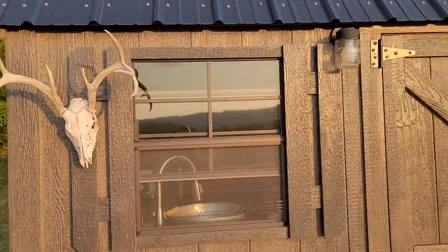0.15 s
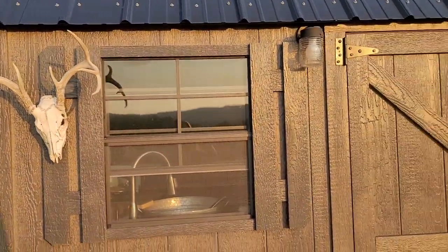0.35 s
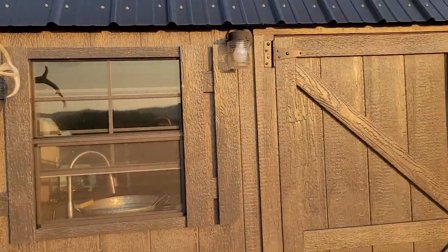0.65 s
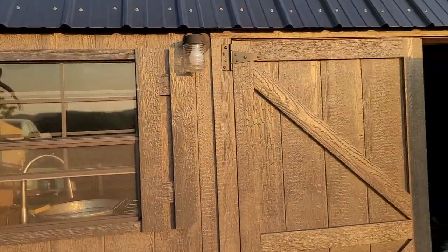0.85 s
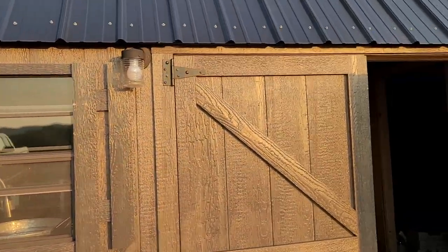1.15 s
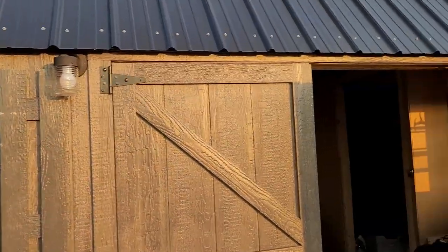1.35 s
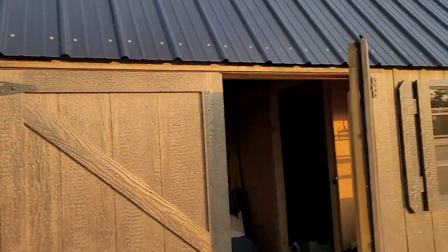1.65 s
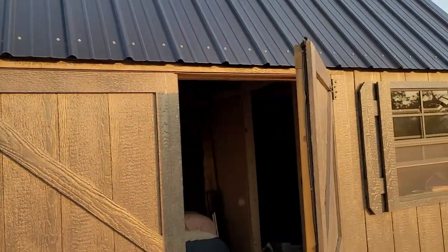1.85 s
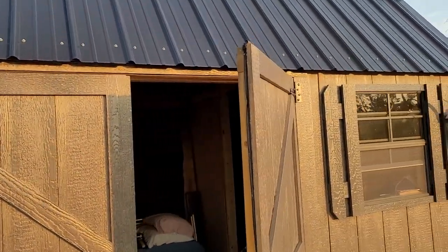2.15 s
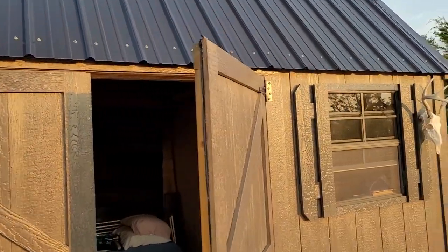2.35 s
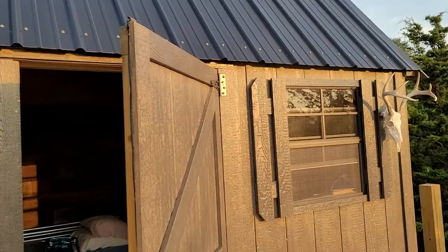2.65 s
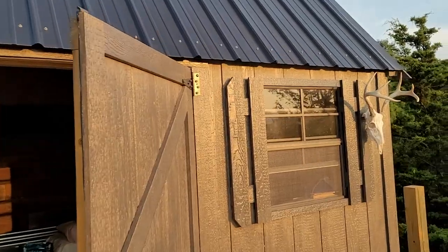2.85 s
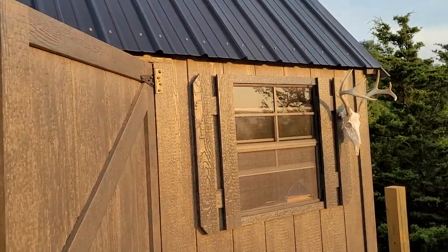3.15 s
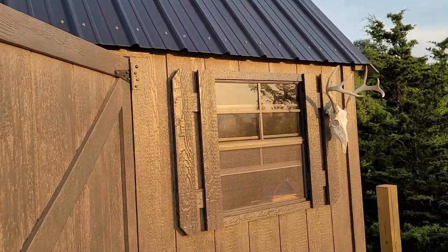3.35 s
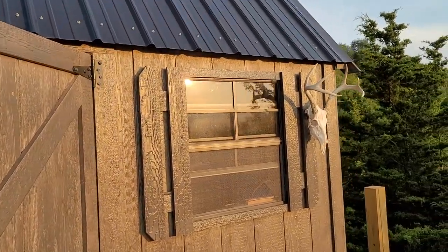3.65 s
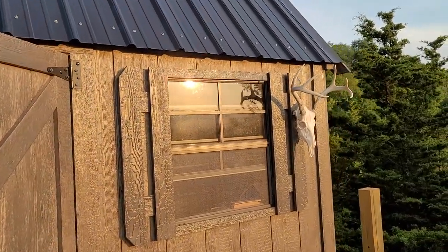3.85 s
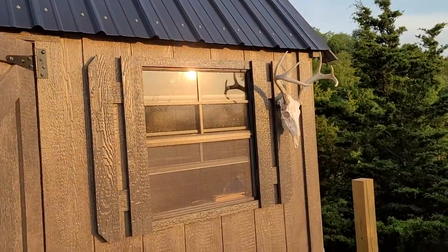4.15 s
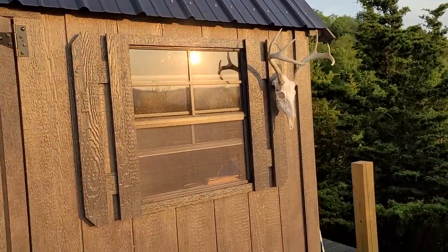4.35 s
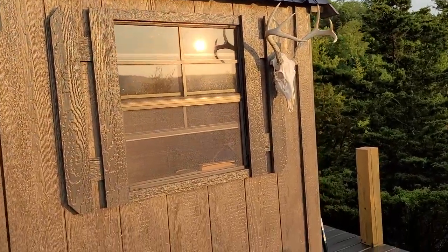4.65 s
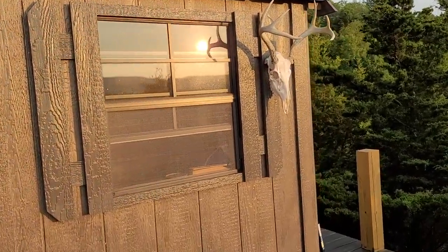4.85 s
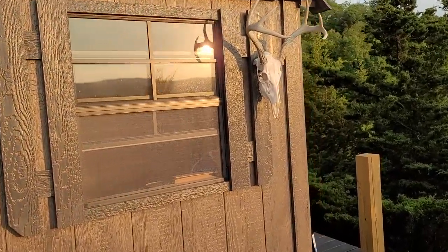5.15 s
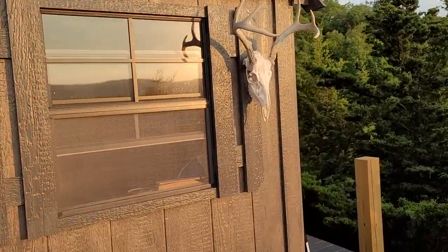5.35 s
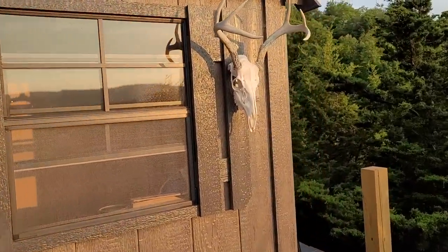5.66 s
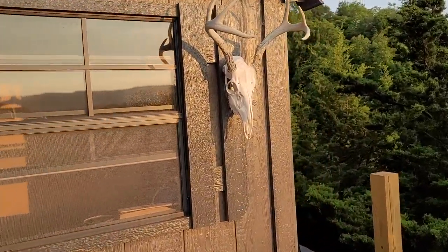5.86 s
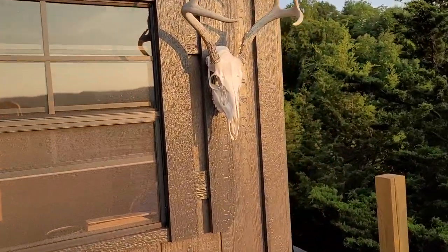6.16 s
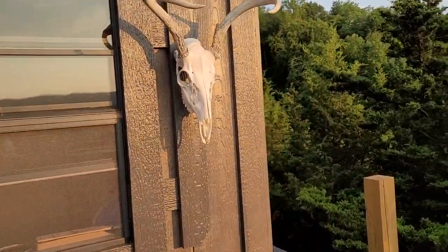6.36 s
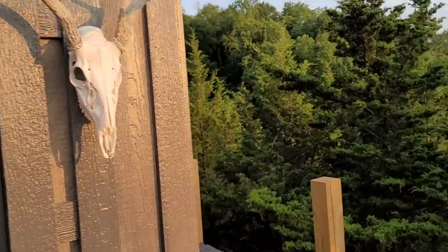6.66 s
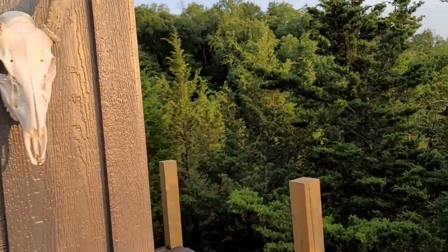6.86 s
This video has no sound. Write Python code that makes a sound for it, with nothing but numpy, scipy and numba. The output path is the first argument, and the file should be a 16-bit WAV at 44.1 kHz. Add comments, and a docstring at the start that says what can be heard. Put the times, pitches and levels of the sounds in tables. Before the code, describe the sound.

Hollow boards respond to irregular steps close to a stereo microphone: dull thuds, a few hard cracking knocks, little scuffs, and low wooden shudders as weight settles. Behind them are a very high, fine insect trill, a single tiny bird chip on the right early on, smooth country air and gusting low rumble. Steps are sparse and soft midway, then strong and crowded near the end.

```python
"""A wooden deck beside a shed wall in the country: someone walks along it unevenly.
Heels thud the joists and knock the planks (struck decaying modes), among short noise bursts (filtered noise).
The deck grumbles under the shifting weight (noise through joist resonances that dies away).
One cricket trills close on the left before a far chorus (gliding tones, grainy noise); a bird chips once
on the right; smooth hiss and gusting low rumble (filtered noise) lie behind."""
import sys
import numpy as np
from scipy import signal
from scipy.fft import rfft, irfft
from scipy.io import wavfile
from scipy.ndimage import uniform_filter1d
from numba import njit

SR = 44100
rng = np.random.default_rng(int(sys.argv[2]) if len(sys.argv) > 2 else 0)


def master(y):
    """Save y as 16-bit WAV."""
    cut = np.clip(np.atleast_2d(y).T, -1, 1)
    pcm = np.round(cut * 32767)  # scale
    wavfile.write(sys.argv[1], SR, pcm.astype(np.int16))


def decibels_to_gain(level_db):
    """Convert a level in decibels to a linear amplitude gain (20 dB per decade)."""
    exponent = np.asarray(level_db, float) / 20
    return 10 ** exponent


N = 308691  # samples
LR = np.array([[1], [-1]])  # sign of left, right


def level(x, db):
    """Scale to an rms level."""
    return x * decibels_to_gain(db) / np.sqrt(np.mean(x ** 2) + 1e-30)


def loudness(x, db, window):
    """Scale a blow so that the loudest stretch of window samples, left-right mean, has this rms."""
    return x * decibels_to_gain(db) / np.sqrt(uniform_filter1d(x.mean(axis=0) ** 2, window).max())


def on_log(hz, table):
    """Read a (Hz, value) table on a log-frequency axis."""
    f, v = np.transpose(table)
    return np.interp(np.log(np.maximum(hz, 1)), np.log(f), v)


def colour(x, gain):
    """Filter by a gain given as a function of Hz."""
    n = x.shape[-1]
    return irfft(rfft(x) * gain(np.arange(n // 2 + 1) * SR / n), n)


def walk(rate_hz):
    """Random levels held 1 / rate_hz seconds and slewed twice; spread near 1."""
    k = int(SR / rate_hz)
    held = np.repeat(rng.standard_normal(N // k + 1), k)
    return 0.87 * uniform_filter1d(uniform_filter1d(held, k), k)[:N]


def add(out, x, start_s):
    """Mix x in at start_s."""
    i = int(start_s * SR)
    out[:, i:i + x.shape[1]] += x[:, :N - i]


@njit
def ring(poles, left, right, size):
    """Impulse response of decaying modes, each with its own size at the two microphones."""
    out = np.zeros((2, size))
    for k in range(len(poles)):
        z = 1 + 0j
        for i in range(min(size, int(-8 / np.log(abs(poles[k]))))):
            out[0, i] += z.imag * left[k]
            out[1, i] += z.imag * right[k]
            z *= poles[k]
    return out


# Stereo width of the struck wood. Each row: frequency in Hz, side minus mid in dB.
WOOD_SIDE_DB = [(60, -14), (200, -14), (350, -6), (700, 3), (1400, 3), (2800, -1), (8000, 0)]


def modes(hz, t60_s, db, size):
    """Strike modes; the bass reaches both microphones alike, the middle often in opposite phase."""
    mid, side = rng.choice([-1., 1.], (2, len(hz))) * decibels_to_gain(db)
    side = side * decibels_to_gain(on_log(hz, WOOD_SIDE_DB))
    poles = np.exp(2j * np.pi * hz / SR - np.log(1000) / (t60_s * SR))
    return ring(poles, mid + side, mid - side, size)


def contact(length_s, size):
    """Spectrum of a landing sole: tiny impacts swell, then thin, and drive all modes about alike."""
    t = np.arange(size) / SR / length_s
    impacts = rng.standard_normal(size) * rng.random(size) ** 6.0
    rattle = rfft(impacts * t * np.exp(-t))
    even = irfft(rattle / np.abs(rattle) ** .7, size)
    return rfft(even * np.exp(-(t / 5) ** 4))


# Footfalls. Each row: start in seconds, knock level in dB (loudest 20 samples), thud level in dB
# (loudest 1300 samples), thud in Hz, favoured plank tone in Hz, treble slope in dB per octave.
FOOTFALLS = [(0.103, -43.5, -23.5, 145.2, 434, -23), (0.187, -43.5, -37, 136.3, 1360, -8),
             (0.31, -46, -39, 143, 444, -19), (0.957, -40.5, -38, 254, 1300, -18),
             (1.037, -48.5, -44.5, 154.5, 536, -21), (1.12, -48, -46, 176, 439, -12),
             (1.173, -28, -44, 144, 600, -14), (1.587, -15.5, -35.5, 200, 673, 2.5),
             (1.878, -53, -45.5, 165.3, 422, -21), (2.068, -20.5, -40.5, 310, 806, -13),
             (2.569, -31, -25.5, 170.5, 645, -10), (2.626, -37, -38, 272, 666, -15.5),
             (3.406, -50.5, -39.5, 297, 394, -7), (3.454, -57.5, -47.5, 221, 423, 1),
             (3.577, -32, -42, 291.4, 610, -30.5), (4.43, -41, -45.5, 121, 800, -12),
             (4.466, -49.5, -39, 156.6, 430, 3), (4.592, -45, -49.5, 189, 566, -20),
             (5.342, -47.5, -41.5, 238, 930, -11.5), (5.484, -40, -41.5, 202.5, 810, -26),
             (5.717, -24, -40.5, 186, 346, -6), (5.828, -15.5, -35, 199.5, 539, 1.5),
             (6.168, -37, -28, 232, 470, -14), (6.22, -35, -34, 187.7, 710, -18.5),
             (6.327, -11.5, -27, 253.5, 990, 3), (6.403, -18.5, -31.5, 302.8, 610, 0.5),
             (6.967, -31.5, -33.5, 312, 423, -23)]
# Strength of the plank modes. Each row: frequency in Hz, relative level in dB.
PLANK_DB = [(250, -6), (400, -5), (620, -1), (850, -5), (1100, 0.5), (1450, 1), (2000, 1.5), (2500, -1),
            (3300, -0.5), (4700, -10), (6100, -3), (7500, -13), (10000, -23.5), (15000, -22)]
# Damping of the plank modes. Each row: frequency in Hz, t60 in seconds.
PLANK_T60_S = [(250, 0.33), (500, 0.16), (1100, 0.096), (2900, 0.056), (8000, 0.038)]
# Scatter from the wall and the hollow under the boards: level in dB, t60 in seconds, treble edge in Hz.
SCATTER_SETTINGS = (-15.5, 0.16, 4900)
BEAM_HZ, BEAM_DB, BEAM_T60_S = 75.9, -2, 0.15  # long beam under the deck; dB is its most, re the thud mode
LOAD_S, LOAD_POWER = 0.011, 2.2  # heel loading time on a 200 Hz joist; longer on lower ones


def step(knock_db, thud_db, thud_hz, tone_hz, slope_db):
    """One footfall: a heel thud in the joists and a knock in the planks."""
    size = 10240
    t = np.arange(size) / SR

    # a firm heel moves the long beam; a flat slap or a gently lowered foot hardly
    beam_db = BEAM_DB - 0.48 * abs(thud_db - knock_db - 8.5)
    joist_hz = np.array([BEAM_HZ, thud_hz, 1.2 * thud_hz, 1.8 * thud_hz])
    joist_t60_s = np.array([BEAM_T60_S, .19, .12, .12])
    joist = modes(joist_hz, joist_t60_s, np.array([beam_db, 0, -9, beam_db - 11]), size)
    # the heel loads the joist over a few cycles, so the thud swells
    load_s = LOAD_S * (200 / thud_hz) ** LOAD_POWER
    thud = joist * (1 - np.exp(-(t / load_s) ** 3))

    # many close, quickly damped plank modes; where the foot lands favours a few
    hz = np.geomspace(250, 15000, num=360) * (1 + .004 * rng.standard_normal(360))
    favour_db = 9.0 * np.exp(-(np.log2(hz / tone_hz) / .15) ** 2)
    # a soft sole loses the treble, bending near 1200 Hz
    soft_db = slope_db * np.log2(1 + (hz / 1200) ** 2) / 2
    plank_db = on_log(hz, PLANK_DB) + soft_db + favour_db
    planks = rfft(modes(hz, on_log(hz, PLANK_T60_S), plank_db, size))

    echo_db, echo_t60_s, edge_hz = SCATTER_SETTINGS
    echoes = rng.standard_normal((2, size)) * 1000. ** (-t / echo_t60_s) * np.minimum(t / .008, 1)
    echoes = rfft(echoes / np.linalg.norm(echoes[0])) * decibels_to_gain(echo_db)
    echoes = echoes / (1 + (np.arange(size // 2 + 1) * SR / size / edge_hz) ** 2)

    # a heavy blow makes the loose boards chatter longer
    rattle_s = 0.0017 * decibels_to_gain(0.23 * (knock_db + 21.5))
    knock = irfft(planks * contact(rattle_s, size) * (1 + echoes), size)
    return loudness(knock, knock_db, window=20) + loudness(thud, thud_db, window=1300)


# Short noise bursts; the one at 1.562 is a faint broadband smear just before the slap.
# Each row: start in seconds, length in seconds, rms in dB, centre in Hz, width in octaves.
NOISE_BURSTS = [(0.162, .02, -60, 1900, 1.5), (1.038, 0.078, -65, 3370, 1.1),
                (1.562, 0.037, -47.5, 2830, 2.4), (1.932, 0.024, -51.5, 2480, 1.9),
                (3.742, 0.11, -69, 1750, 2), (4.45, 0.079, -64, 3360, 1.4), (4.535, 0.12, -64, 3100, 1.1),
                (4.717, 0.052, -69, 1210, 0.56), (5.435, 0.015, -59, 1490, 1.4),
                (5.563, 0.03, -53.5, 2300, 2.1), (6.779, 0.014, -67.5, 1700, 0.42)]


def noise_burst(length_s, db, hz, octaves):
    """Band of noise whose level jumps at random every few milliseconds."""
    size = int(length_s * SR)
    jump_db = 4.8 * np.repeat(rng.standard_normal(size // 100 + 1), 100)[:size]
    grains = rng.standard_normal((2, size)) * decibels_to_gain(jump_db) * np.hanning(size) ** 0.16
    band = colour(grains, lambda f: np.exp(-(np.log2(f / hz + 1e-9) / octaves) ** 2 * 2))
    return level(band, db)


# Weight settling on the boards. Each row: start in seconds, rms in dB before shudder, t60 in seconds.
SETTLING = [(0.14, -43, 0.89), (0.968, -39.5, 1.19), (1.18, -43, 0.29), (1.61, -33, 0.63), (1.88, -62, 9),
            (2.08, -32, 0.32), (2.6, -40.5, 1.27), (3.42, -39, 0.3), (3.6, -58.5, 5.4), (4.44, -41.5, 1.14),
            (4.6, -50.5, 0.56), (5.35, -50, .4), (5.5, -48, 1.1), (5.64, -51.5, 2.6), (5.838, -35.5, 0.7),
            (6.19, -49, 3.3), (6.339, -40.5, 1.9), (6.6, -62.5, 2.5)]
# Joist resonances. Each row: centre in Hz, width in Hz, relative gain in dB.
JOIST_RESONANCES = [(142, 35, 2.5), (200, 63, 4), (247, 210, -16.5), (371.7, 17, -18), (680, 580, -23.5)]
WEIGHT_RISE_S = 0.0083


def deck():
    """Weight settling on a foot shakes the joist resonances in uneven shudders that die away."""
    def gain(f):
        peaks = sum(decibels_to_gain(db) / np.sqrt(1 + ((f - hz) / (width_hz / 2)) ** 4)
                    for hz, width_hz, db in JOIST_RESONANCES)
        return peaks * np.minimum(f / 110, 1) ** 3

    mid, side = rng.standard_normal((2, N))
    side = colour(side, lambda f: gain(f) * decibels_to_gain(on_log(f, WOOD_SIDE_DB)))
    grumble = colour(mid, gain) + LR * side
    power = 0
    for start_s, db, t60_s in SETTLING:
        since_s = np.maximum(np.arange(N) / SR - start_s, 0)
        rise = np.minimum(since_s / WEIGHT_RISE_S, 1)
        power = power + (decibels_to_gain(db - 60 * since_s / t60_s) * rise) ** 2
    shudder = decibels_to_gain(3.5 * walk(25))
    return level(grumble, 0) * np.sqrt(power) * shudder


def trill(hz, rate_hz, glide, duty, limp, scatter_db):
    """Each wing stroke is a short tone, quick to start, sliding down; limp pairs strokes: short gap, long."""
    beat = np.cumsum(rate_hz * (1 + .015 * walk(3))) / SR + rng.random()
    early = limp * (np.floor(beat) % 2)
    part = np.clip((beat % 1 - limp + early) / duty, 0, 1)  # progress through the stroke
    stroke = np.sin(np.pi * part ** .65)
    pitch_hz = hz * (1 + glide * (.5 - part) + 0.0048 * walk(90))
    tone = stroke * decibels_to_gain(scatter_db * walk(60)) * np.sin(2 * np.pi * np.cumsum(pitch_hz) / SR)
    return level(colour(tone, lambda f: 1 / (1 + (f / 8900) ** 60)), 0)


# Cricket levels. Each row: time in seconds, near level in dB (left plays 6 dB above it),
# chorus rms in dB before panning.
CRICKET_LEVELS = [(0, -60, -52), (0.801, -61.5, -53.5), (1.5, -57.5, -53.5), (2.2, -59.5, -55),
                  (3.001, -61.5, -55), (3.7, -60, -54), (4.15, -56, -55), (4.4, -83, -54),
                  (5.2, -71, -55.5), (6, -68, -56), (7, -66.5, -57)]
# Chorus spectrum. Each row: frequency in Hz, relative level in dB.
CHORUS_DB = [(5800, -36), (6300, -25.5), (6760, -13.5), (7200, -7.5), (7700, -4), (8100, -9.5), (8500, -20),
             (8850, -28.5), (9200, -68)]
NEAR_PAN_DB, CHORUS_PAN_DB = 15, 5  # left minus right


def crickets():
    """A near singer and a far crowd whose strokes blur into a grainy band."""
    time_s, near_db, far_db = np.transpose(CRICKET_LEVELS)
    t = np.arange(N) / SR
    near = trill(7850, 52.5, .07, .37, .22, 2.5)
    near = near * decibels_to_gain(LR * NEAR_PAN_DB / 2) / decibels_to_gain(NEAR_PAN_DB / 2) * 2
    blur = colour(rng.standard_normal((2, N)), lambda f: decibels_to_gain(on_log(f, CHORUS_DB)))
    far = level(blur * decibels_to_gain(1.3 * np.array([walk(160), walk(120)])), 0)
    for hz in np.linspace(6900, 8200, num=4):
        singer = trill(hz, rng.uniform(45, 68), .05, .55, .15, 3.0)
        far = far + singer * decibels_to_gain(on_log(hz, CHORUS_DB) - 6 + LR * rng.standard_normal())
    near = near * decibels_to_gain(np.interp(t, time_s, near_db))
    return near + level(far, 0) * decibels_to_gain(np.interp(t, time_s, far_db) + LR * CHORUS_PAN_DB / 2)


# One bird chip: start in seconds, length in seconds, rms in dB before panning, final pitch in Hz.
CHIP = (.925, .045, -60, 6500)


def bird():
    """A chip whose pitch drops steeply, then holds; 8 dB louder on the right."""
    _, length_s, db, hz = CHIP
    t = np.arange(int(length_s * SR)) / SR
    pitch_hz = hz * (1 + .1 * np.exp(-t / .004))
    tone = np.sin(2 * np.pi * np.cumsum(pitch_hz) / SR) * np.hanning(len(t)) ** .5
    return level(tone, db) * decibels_to_gain(-4 * LR)


# Hiss spectrum. Each row: frequency in Hz, relative density in dB per Hz.
HISS = [(60, -24.5), (140, -10.5), (290, -17), (510, -16), (990, -27), (1350, -23), (2750, -28),
        (4500, -25.5), (6500, -24), (8600, -56), (9300, -66.5), (11000, -53), (12500, -39.5), (15000, -39)]
HISS_DB = -64  # rms
# Stereo width of hiss and rumble. Each row: frequency in Hz, side minus mid in dB.
BACKGROUND_SIDE_DB = [(60, -8.5), (110, -1), (200, -3), (380, 4.5), (700, 3.5), (1290, 3), (2380, 0.5),
                      (4400, 1.5), (8120, -3.5), (15000, 2.5)]
# Rumble level. Each row: time in seconds, rms in dB before random gusting.
RUMBLE_LEVELS = [(0.0, -58), (0.25, -60), (0.51, -57.5), (0.74, -62.5), (1.15, -57.5), (1.54, -66.5),
                 (1.85, -52.5), (2.46, -65.5), (2.79, -50), (3.86, -60.5), (4.19, -58.5), (4.64, -44),
                 (5.03, -62.5), (6.2, -58), (6.34, -53), (7.0, -59.5)]
# Rumble spectrum. Each row: frequency in Hz, relative density in dB per Hz.
LOW_RUMBLE = [(20, -16), (32, -3), (50, 9.5), (75, 5), (110, -4.5), (170, -29.5), (300, -72.5)]


def air():
    """Country background: smooth hiss over a gusting rumble, both filtered noise."""
    def wide(table):
        mid, side = rng.standard_normal((2, N))
        mid = colour(mid, lambda f: decibels_to_gain(on_log(f, table)))
        side = colour(side, lambda f: decibels_to_gain(on_log(f, table) + on_log(f, BACKGROUND_SIDE_DB)))
        return level(mid + LR * side, 0)

    time_s, db = np.transpose(RUMBLE_LEVELS)
    gust_db = np.interp(np.arange(N) / SR, time_s, db) + 4.5 * walk(4.4)
    return wide(HISS) * decibels_to_gain(HISS_DB) + wide(LOW_RUMBLE) * decibels_to_gain(gust_db)


def scene():
    """Feet, noise bursts, deck, insects, bird and air."""
    out = deck() + crickets() + air()
    for start_s, *row in FOOTFALLS:
        add(out, step(*row), start_s)
    for start_s, *row in NOISE_BURSTS:
        add(out, noise_burst(*row), start_s)
    add(out, bird(), CHIP[0])
    return out


def low_pass(x):
    """Removes everything above the highest recorded frequency."""
    return signal.sosfilt(signal.butter(12, 15830, fs=SR, output="sos"), x)


def record(dry):
    """Clip the mix at full scale."""
    mix = np.clip(dry, -1, 1)
    return low_pass(mix)


dry = scene()
out = record(dry)
master(out)
```